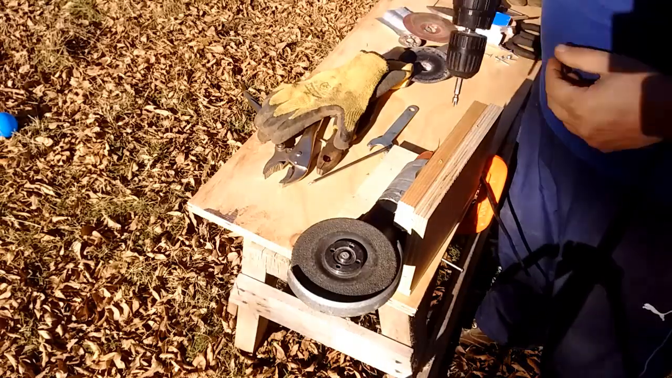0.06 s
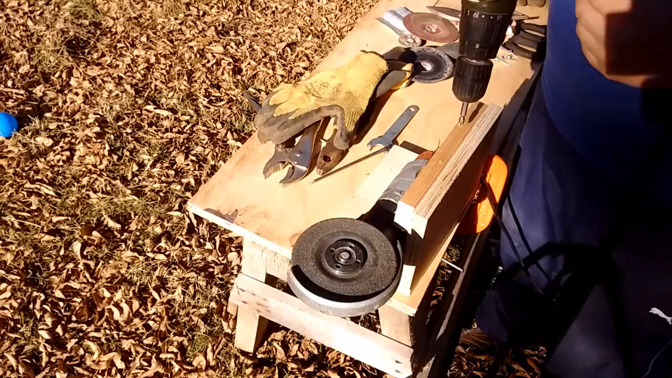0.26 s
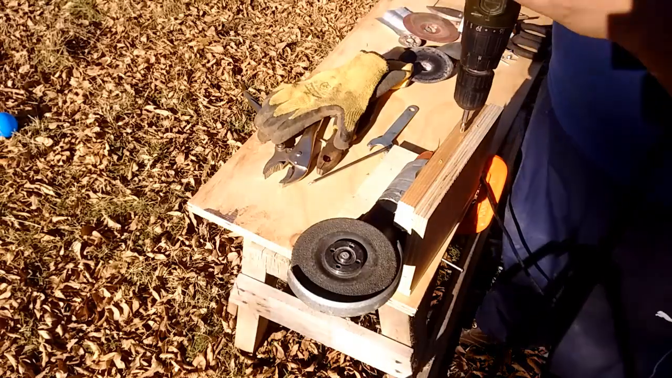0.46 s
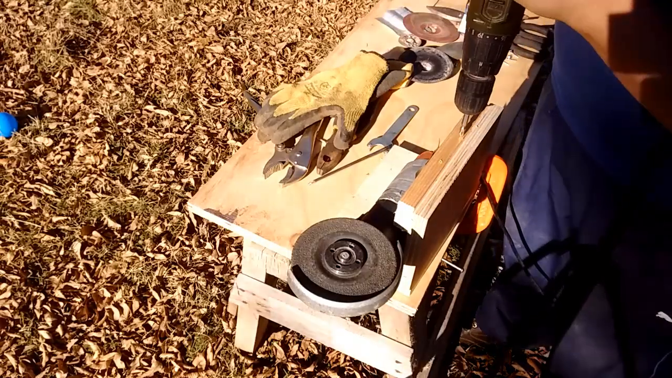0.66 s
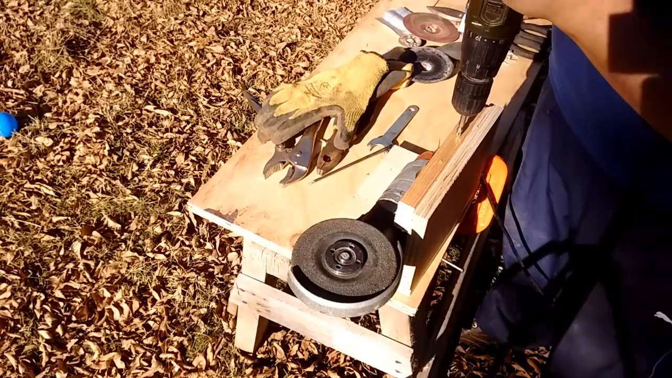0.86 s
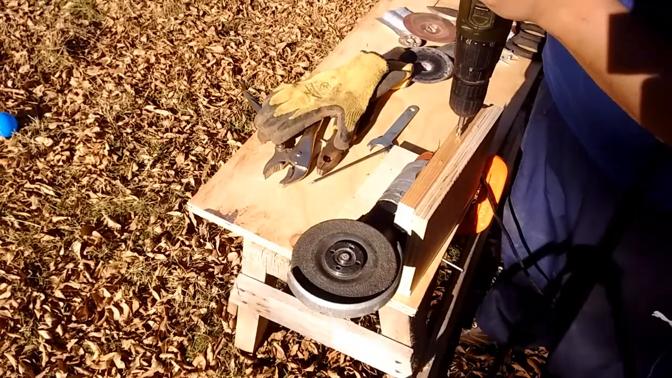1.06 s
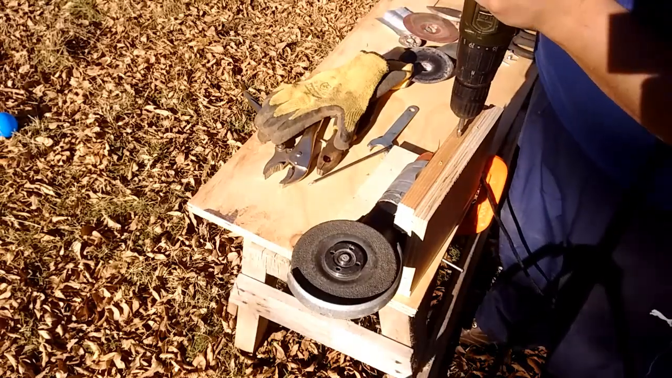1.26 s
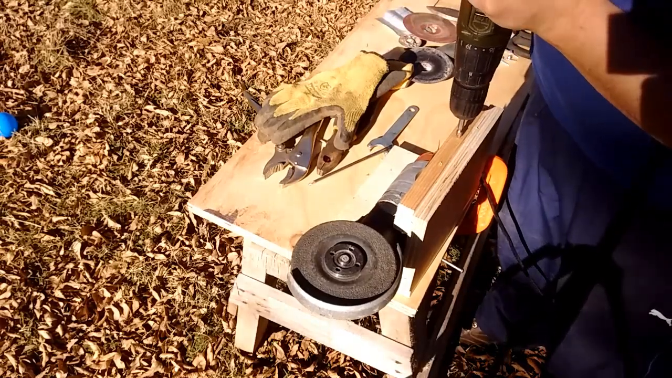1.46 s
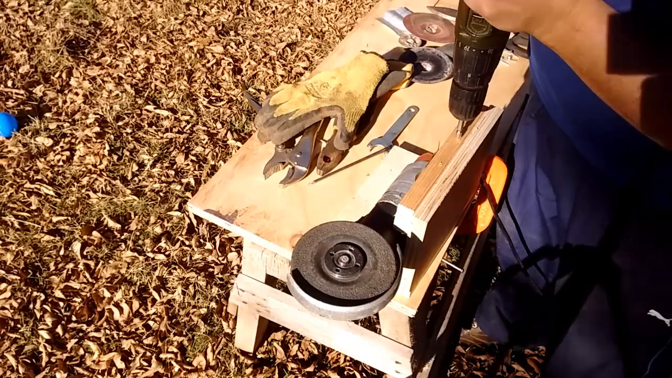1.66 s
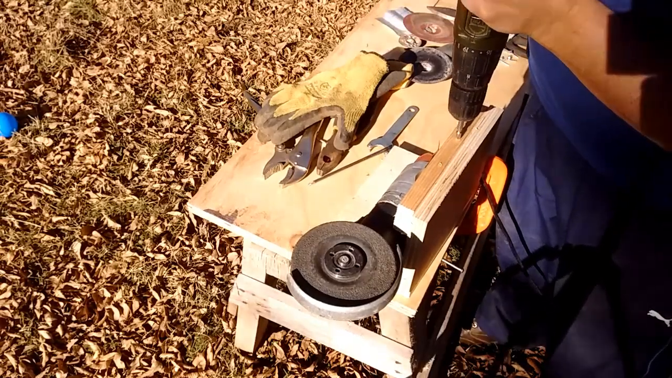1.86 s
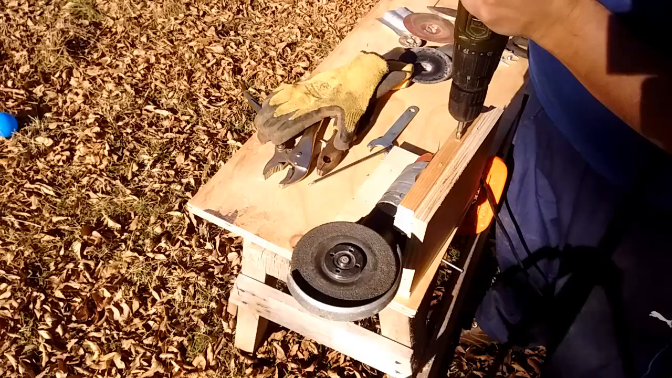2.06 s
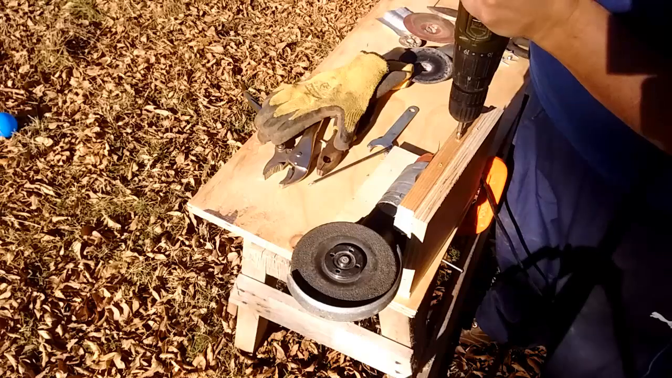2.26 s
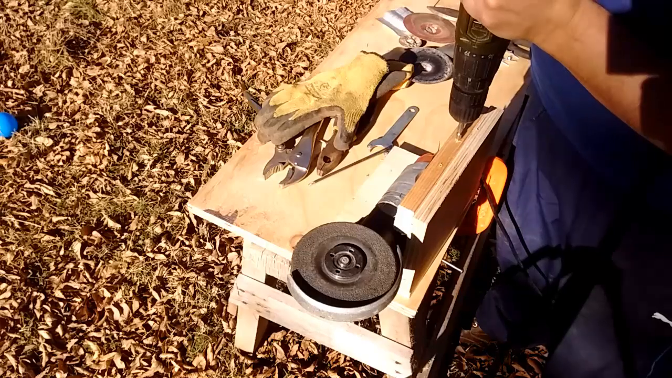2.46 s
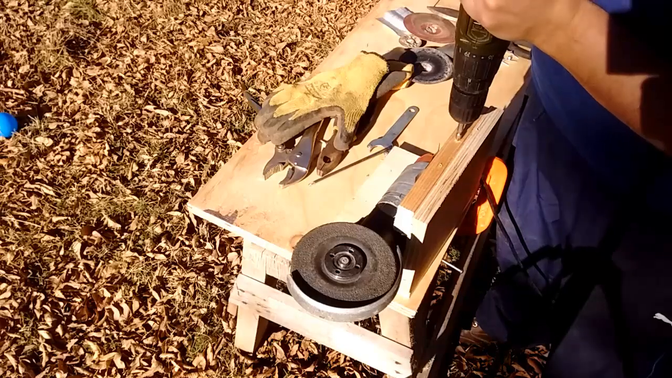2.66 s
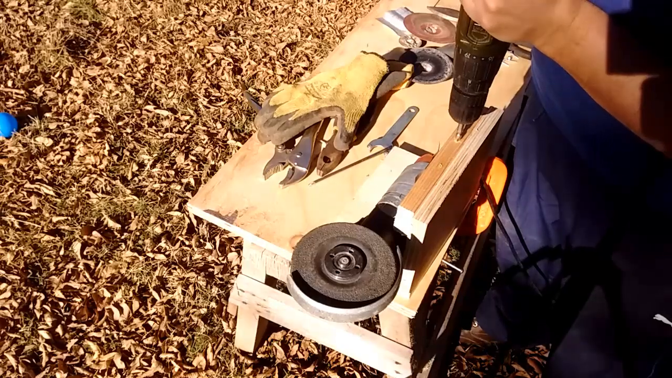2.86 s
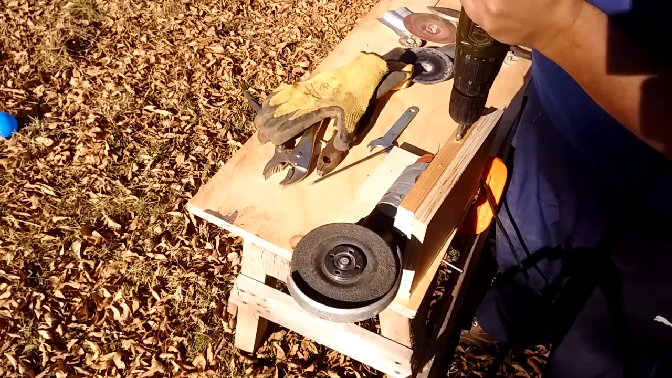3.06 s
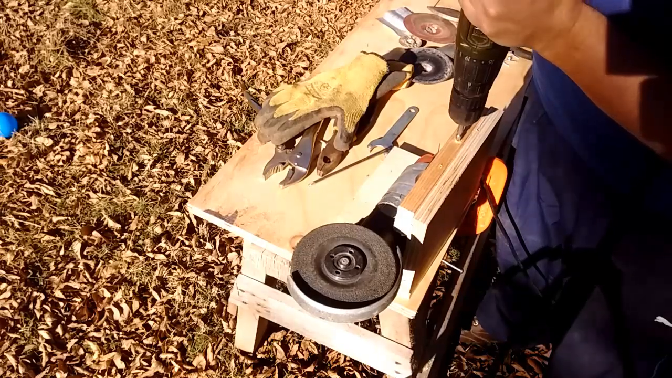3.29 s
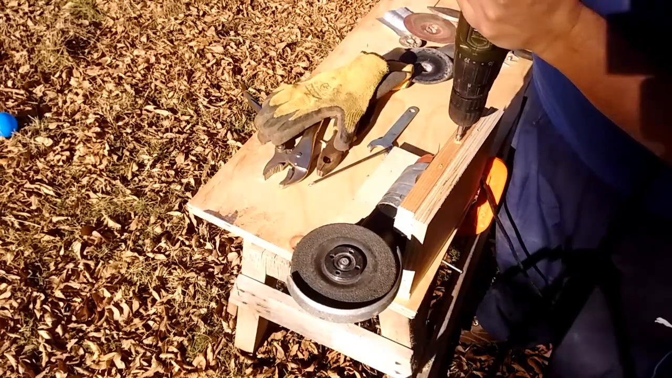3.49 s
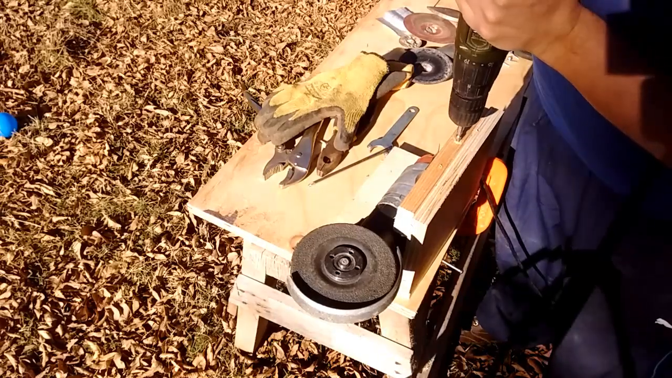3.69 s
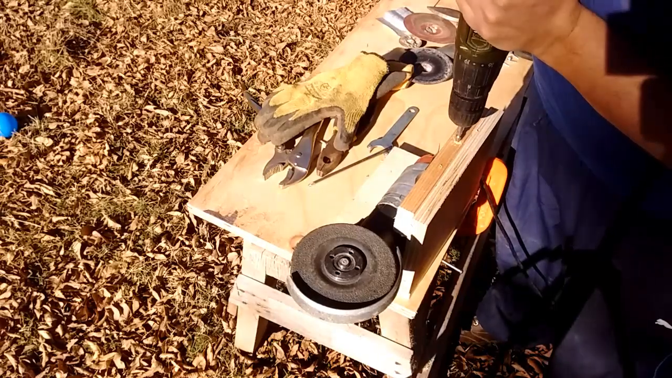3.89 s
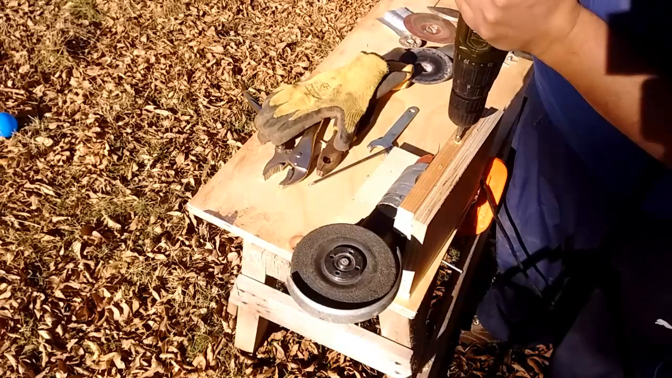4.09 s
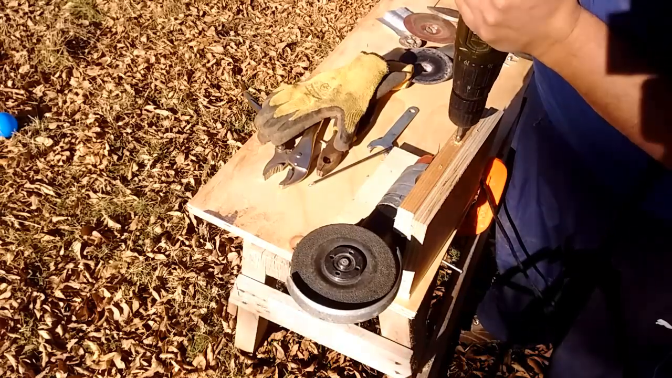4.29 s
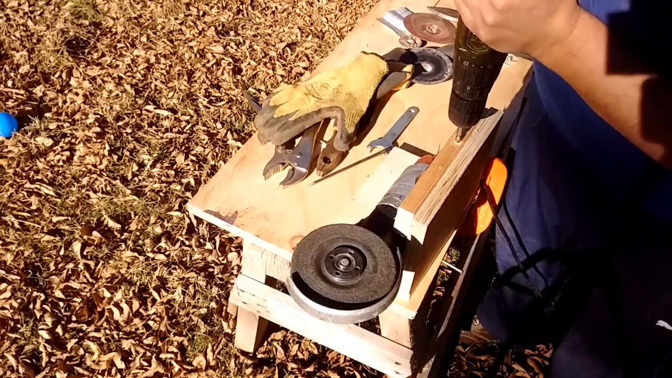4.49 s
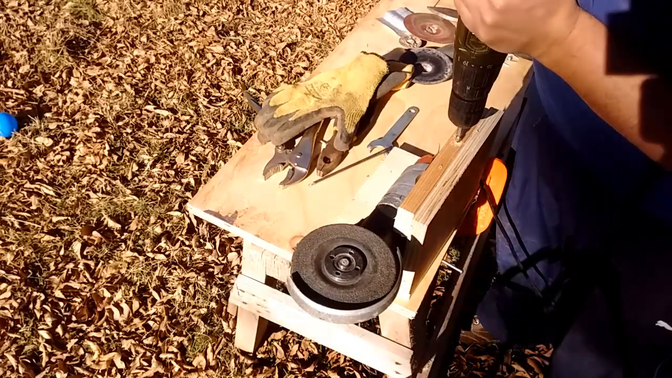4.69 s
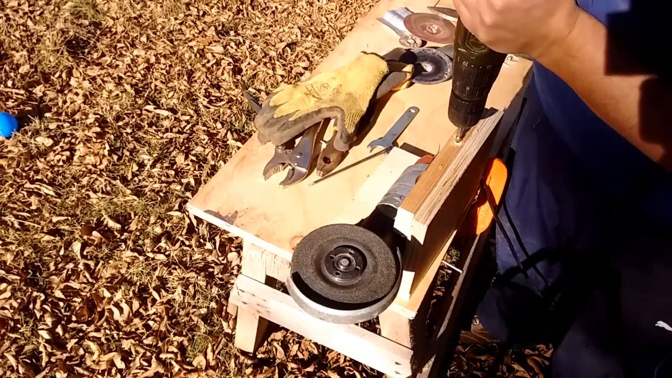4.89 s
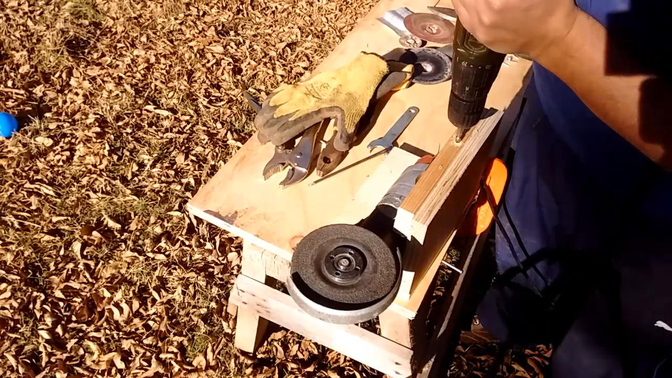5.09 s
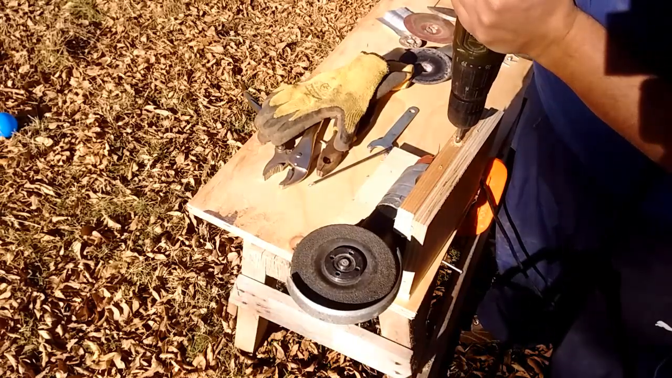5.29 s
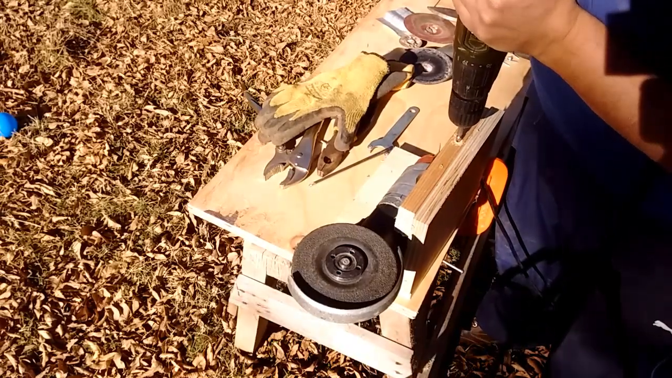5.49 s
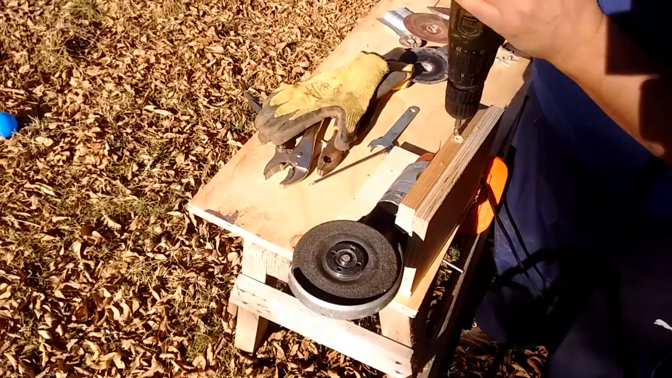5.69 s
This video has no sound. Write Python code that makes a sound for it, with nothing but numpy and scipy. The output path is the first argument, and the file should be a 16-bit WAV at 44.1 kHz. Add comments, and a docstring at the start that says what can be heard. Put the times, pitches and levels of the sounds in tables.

```python
"""Dry leaves rustle and a far road hums outdoors; the drill ticks in the hand and light gusts rumble on the microphone.
At 1.3 s a cordless drill judders and runs up, pressing a countersink into a wooden board. Shaft-locked tones whine
and slowly sag under the load, shaped noise rasps like torn wood, and resonant noise lets the bit squeal as it sinks.
From 3.7 to 4.8 s hard gusts and low thumps strike the microphone, and the drill's level dips briefly.
At 5.5 s the brake judders, the gears clatter to rest as decaying noise, and the chuck and housing tick."""
import sys
import numpy as np
from scipy import signal
from scipy.fft import rfft, irfft, next_fast_len
from scipy.io import wavfile
from scipy.ndimage import uniform_filter1d, map_coordinates

SR = 44100
rng = np.random.default_rng(int(sys.argv[2]) if len(sys.argv) > 2 else 0)


def master_out(mix):
    """Clip the mix to full scale and print it as 16-bit PCM to the path in sys.argv[1]."""
    frames = np.transpose(np.atleast_2d(mix))
    ceiling = np.clip(frames, -1, 1)
    pcm = np.round(ceiling * 32767).astype(np.int16)
    wavfile.write(sys.argv[1], SR, pcm)


N = 253134

# how the two microphone ports hear the bench [f/Hz, left-right/dB, left lead/rad, coherence]
NEAR = [(300, 5.5, -3.1, 0.92), (450, 1.2, -3.1, 0.93), (620, 1.7, -3.0, 0.93), (750, 1.7, -3.0, 0.76),
        (900, 1.7, -3.0, 0.88), (1150, 12.0, -2.4, 0.44), (1350, 13.5, -1.2, 0.44), (1600, 5.9, 0.3, 0.48),
        (1850, 3.1, 1.2, 0.89), (2100, 0.7, 1.6, 0.64), (2400, -1.1, 2.1, 0.78), (2750, 2.1, 2.6, 0.68),
        (3100, 1.5, 3.05, 0.88), (3350, 2.0, 3.0, 0.78), (3650, 4.2, 2.8, 0.8), (4100, 6.8, 2.2, 0.19),
        (4550, 3.0, 0.2, 0.84), (5000, 0.2, 0.3, 0.71), (5600, -2.7, 1.0, 0.29), (6400, 0.1, 2.8, 0.76),
        (7300, 0.5, 0.9, 0.57), (8300, -2.1, 0.2, 0.46), (9500, -0.5, -2.9, 0.16), (11000, 1.8, -5.4, 0.22),
        (13200, 9.6, -5.4, 0.29), (15000, 8.7, -7.0, 0.19)]
# how they hear the yard [f/Hz, left-right/dB, left lead/rad, coherence]
FAR = [(100, 2.4, 3.0, 0.88), (500, 2.1, 3.1, 0.86), (750, 7.4, 3.0, 0.53), (980, 13.7, 0.2, 0.26),
       (1400, 4.0, 0.0, 0.85), (2100, 3.7, -0.2, 0.63), (3000, 3.5, -3.1, 0.75), (3600, 6.1, -2.8, 0.59),
       (4600, 1.5, -0.1, 0.75), (6300, 1.9, -3.2, 0.62), (8000, -0.7, -0.2, 0.53), (13000, 2.0, 0.6, 0.07)]
# shaft speed, sagging as the cone deepens [t/s, speed/turns per s]
SPEED = [(1.56, 308.3), (1.95, 306.6), (2.5, 306.6), (3, 304), (3.65, 302.2), (4.5, 299), (4.8, 299.4),
         (5.45, 296.8)]
# trigger pulled, trigger let go, and the time the gears need to take up their slack (s)
START_S, STOP_S, SLACK_S = 1.272, 5.472, .015


def amp(db):
    """Gain of a level in dB."""
    return 10 ** (np.asarray(db) / 20)


def unit(x):
    """x scaled to an rms of 1."""
    return x / np.sqrt(np.mean(x ** 2) + 1e-20)


def clock():
    """The time of every sample in seconds."""
    return np.arange(N) / SR


def ramp(start_s, length_s):
    """0 before the start, rising evenly to 1."""
    return np.clip((clock() - start_s) / length_s, 0, 1)


def along(rows, hz):
    """Each column of a table after its frequency, read on a log axis."""
    f, *columns = np.transpose(rows)
    return [np.interp(np.log(hz + 1), np.log(f + 1), column) for column in columns]


def curves(rows):
    """One value per sample for each column of a table after its time."""
    s, *columns = np.transpose(rows)
    return [np.interp(clock(), s, column) for column in columns]


def wobble(rate):
    """A smooth random curve, rate knots a second."""
    knots = rng.standard_normal(int(N * rate / SR) + 4)
    return map_coordinates(knots, [np.arange(N) * rate / SR])


def swells(rows, rise_s, fall_s):
    """Gain of events (t/s, hold/s, level/dB) that rise, hold and die away."""
    t = clock()
    events = []
    for s, hold, db in rows:
        rising = np.maximum(s - t, 0) / rise_s
        falling = np.maximum(t - s - hold, 0) / fall_s
        events.append(amp(db) * np.exp(-rising - falling))
    return np.max(events, axis=0)


def filtered(x, response):
    """x shaped by a complex response of frequency."""
    size = next_fast_len(N + SR // 4)
    return irfft(rfft(x, size) * response(np.fft.rfftfreq(size, 1 / SR)), size)[..., :N]


def resonance(hz, centre_hz, width_hz):
    """Response of one damped mode."""
    damping = 1j * hz * width_hz
    return damping / (centre_hz ** 2 - hz ** 2 + damping)


def port_gains(ports, hz):
    """Complex gains of the left and right port, and their coherence."""
    tilt_db, lead, alike = along(ports, hz)
    pair = np.array([amp(tilt_db / 2) + 0j, amp(-tilt_db / 2) * np.exp(-1j * lead)])
    return pair / np.sqrt(np.mean(abs(pair) ** 2, axis=0)), np.clip(alike, 0, 1)


def rush(colour, ports):
    """Coloured noise of rms 1 as the two ports hear it."""
    size = next_fast_len(N)
    hz = np.fft.rfftfreq(size, 1 / SR)
    a, b = rfft(rng.standard_normal((2, size)))
    pair, alike = port_gains(ports, hz)
    left_right = np.array([a, alike * a + np.sqrt(1 - alike ** 2) * b])
    return unit(irfft(left_right * pair * colour(hz), size)[:, :N])


def leaves():
    """Dry leaves rustle as fluttering noise that slowly dies down."""
    # colour of the rustle [f/Hz, relative level/dB per Hz]
    leaf_colour = [(60, -11), (300, -2.5), (550, 4.5), (800, 0.5), (1100, 3), (1350, 3.5), (1700, -2),
                   (2300, 3), (3100, -4.5), (4000, -6.5), (6000, -17.5), (8500, -18), (15000, -22.5)]
    level_db, calm_db_per_s = -50, 1.1
    rustle = amp(.7 * wobble(rate=30) + .7 * wobble(rate=500))
    noise = rush(lambda hz: amp(along(leaf_colour, hz)[0]), FAR)
    return amp(level_db - calm_db_per_s * clock()) * rustle * noise


def far_road():
    """Tyre noise of a far road hums in three bands and swells now and then."""
    # swells above the steady hum [t/s, hold/s, level/dB]
    road_swells = [(.57, 0.11, -49.5), (.95, .1, -52.5), (1.12, 0.045, -46.5)]
    # bands of the tyre noise [f/Hz, width/Hz, relative level/dB]
    tyre_bands = [(706, 100, -6.5), (952, 110, 1), (1386, 110, -8)]
    hum_db = -61
    traffic = np.hypot(amp(hum_db), swells(road_swells, rise_s=0.11, fall_s=0.17))

    def colour(hz):
        return sum(amp(db) * abs(resonance(hz, centre, width)) ** 2 for centre, width, db in tyre_bands)

    return traffic * rush(colour, FAR)


def wind():
    """Gusts rumble on the microphone ports; the harder they blow, the higher they reach."""
    # colour of the rumble [f/Hz, light relative level/dB per Hz, hard relative level/dB per Hz]
    buffet_colour = [(15, -32, -38), (39.7, 4.5, -39), (73.5, 0.5, -0.5), (110, -11, -3.5), (167, -41, -12),
                     (232, -50, -20.5), (374, -45, -26), (1000, -74, -85), (3000, -120, -120)]
    # gusts [t/s, hold/s, level/dB]
    gusts = [(.68, 0.026, -42.5), (1.41, 0.09, -45), (3.718, 0.025, -29), (3.81, 0.021, -42),
             (4.1, 0.14, -35), (4.4, 0.075, -42), (4.62, 0.033, -31), (4.69, 0.13, -31.5)]
    # breeze between them, before its eddies [t/s, level/dB]
    breeze_levels = [(0, -59), (.3, -48), (3.6, -54), (4.85, -44), (5.05, -57), (5.7, -56)]
    breeze = amp(curves(breeze_levels)[0])
    gust = swells(gusts, rise_s=0.0068, fall_s=0.026)
    gust_db = 20 * np.log10(np.maximum(breeze, gust))
    light = rush(lambda hz: amp(along(buffet_colour, hz)[0]), FAR)
    hard = rush(lambda hz: amp(along(buffet_colour, hz)[1]), FAR)
    force = np.clip((gust_db + 46.0) / 16, 0, 1)
    buffet = np.sqrt(1 - force) * light + np.sqrt(force) * hard
    # level out the noise so that it follows the gust curve
    loudness = np.sqrt(abs(uniform_filter1d(np.mean(buffet ** 2, axis=0), size=SR // 70)) + 1e-6)
    # a light breeze arrives in separate eddies
    eddies_db = (1 - force) * (3.2 * wobble(rate=26) - .5)
    return amp(gust_db + eddies_db) * buffet / loudness


def thumps():
    """Each eddy that strikes the microphone is one low push and pull on the ports."""
    # single eddies [t/s, level/dB, f/Hz]
    eddies = [(.382, -31, 115), (.803, -20.5, 110), (1.403, -26.5, 85), (1.456, -32, 99), (2.5, -34, 80),
              (3.719, -19, 116), (3.742, -26, 113), (3.812, -18, 110), (3.875, -34, 104), (3.941, -25, 115),
              (4.015, -34, 90), (4.089, -17, 140), (4.162, -28, 91), (4.194, -28, 118), (4.22, -20, 125),
              (4.278, -32, 90), (4.404, -32, 100), (4.61, -27, 92), (4.639, -23, 105), (4.703, -22, 103),
              (4.743, -20, 113), (4.777, -16.5, 135), (4.8, -25, 146), (4.825, -30, 110)]
    length_cycles = .62
    out = np.zeros((2, N))
    for s, db, hz in eddies:
        cycles = hz * (clock() - s)
        push = amp(db) * np.exp(-(cycles / length_cycles) ** 2 + 2j * np.pi * cycles)
        out += np.imag(port_gains(FAR, hz)[0][:, None] * push)
    return out


def ticks():
    """Contacts and slides of chuck and housing, each a burst of noise with one broad ring."""
    # ticks as the drill is handled [t/s, level/dB, ring f/Hz, t60/s]
    contacts = [(0.011, -37.5, 2330, 0.024), (.0485, -32, 2350, 0.022), (.075, -56.5, 5000, 0.63),
                (0.269, -48, 4000, .02), (1.3327, -24, 2600, 0.0087), (5.473, -26, 2800, .006),
                (5.535, -29, 7800, 0.0059), (5.545, -48, 6000, .02), (5.572, -45, 7900, 0.0069),
                (5.576, -38.5, 7700, 0.014), (5.574, -45, 555, 0.076), (5.6, -60, 7900, 1),
                (5.615, -37.5, 7500, 0.0068), (5.631, -49, 7900, .01), (5.674, -45, 6760, 0.015),
                (5.715, -43, 5160, 0.035), (5.715, -38, 674, 0.05), (5.724, -44, 7900, .012)]
    rise_s = .0004
    out = np.zeros((2, N))
    for s, db, ring_hz, t60 in contacts:
        crack = rush(lambda hz: abs(resonance(hz, ring_hz, .3 * ring_hz)) ** 1.5, NEAR)
        out += crack * ramp(s - rise_s, rise_s) * amp(db - 60 * abs(clock() - s) / t60)
    return out


def judders():
    """Short narrow tones of unsteady pitch: a brief electronic whine as the trigger is pulled, then sudden
    changes of torque that shake single modes of drill and board."""
    # a whine as the trigger is pulled, then judders as the bit bites and the brake grips [t/s, length/s, f/Hz,
    # width/Hz, level/dB]
    jerks = [(1.267, 0.037, 5160, 450, -45.5), (1.301, 0.033, 2340, 255, -28.5),
             (1.309, 0.02, 641, 452, -32.5), (1.338, 0.026, 683, 159.5, -24), (1.354, 0.09, 2338, 218, -33),
             (5.47, .014, 2400, 296.5, -31), (5.463, .012, 1400, 300, -38), (5.478, 0.016, 720, 300, -21.5)]
    out = np.zeros((2, N))
    for s, length, centre_hz, width_hz, db in jerks:
        pitch_hz = centre_hz + width_hz / 3 * wobble(width_hz)
        angle = 2 * np.pi * np.cumsum(pitch_hz) / SR
        swell = amp(db + 1.5 * wobble(rate=250)) * np.exp(-2 * ((clock() - s) / length) ** 2)
        gains = port_gains(NEAR, centre_hz)[0][:, None]
        out += np.sqrt(2) * swell * np.real(gains * np.exp(1j * angle))
    return out


def lines(rows, turns, flutter_db, play, speed=None):
    """Shaft-locked tones: backlash shakes their phase, uneven load their size; a given speed moves their port gains."""
    out = np.zeros((2, N))
    backlash = play * wobble(rate=70)
    speed = np.mean(SPEED, axis=0)[1:] if speed is None else speed
    for multiple, db in rows:
        size = amp(db) * unit(amp(flutter_db * wobble(rate=35)))
        angle = 2 * np.pi * multiple * (turns + backlash)
        gains = port_gains(NEAR, multiple * speed)[0]
        out += np.sqrt(2) * size * np.real(gains * np.exp(1j * angle))
    return out


def body_db(hz):
    """Lift that the resonances of housing, bit and board give to each frequency."""
    # resonances [f/Hz, width/Hz, lift/dB]
    body_modes = [(321, 44, 16.5), (450, 23, 11), (646, 101, 12.5), (913, 54, 12), (1332, 320, 10),
                  (1833, 145, 6), (2756, 73, 7), (3580, 330, 8.5), (4540, 620, 4), (5640, 110, 6.5),
                  (6500, 110, 6), (13700, 1500, 5)]
    return sum(db * abs(resonance(hz, centre, width)) ** 2 for centre, width, db in body_modes)


def spin_up(turns, speed, pace):
    """Under starting torque rough motor tones sweep up through the resonances of the body."""
    # motor tones under strain [multiple of the shaft speed, level before body and torque/dB]
    strained_tones = [(3, -37), (4, -39.5), (6.066, -43), (8.333, -36), (15, -46)]
    torque = 4 * pace * (1 - pace) * ramp(START_S + SLACK_S, SLACK_S) * (clock() < STOP_S)
    rough = unit(amp(2 * wobble(rate=400)))
    jolts = .011 * wobble(rate=350)
    rows = [(multiple, db + body_db(multiple * speed)) for multiple, db in strained_tones]
    return torque * rough * lines(rows, turns + jolts, flutter_db=1.5, play=.002, speed=speed)


def run_down(turns):
    """The braked gears clatter to rest in the midrange, ever more slowly, outlasting the cut."""
    # colour of the clatter [f/Hz, relative level/dB per Hz]
    clatter_colour = [(150, -24), (400, -3), (620, 6.5), (950, 3.5), (1130, -6), (1400, -0.5), (1750, -11),
                      (2400, -3), (3200, -12), (3900, -8), (4250, -9), (4800, -13.5), (12000, -24)]
    level_db, fade_db_per_s, rise_s = -37.5, 95, 0.0038
    turn_knock = np.cos(2 * np.pi * (turns - turns[-1] + .25))
    knocks = unit(amp(4 * turn_knock + 2 * wobble(rate=160)))
    clatter = rush(lambda hz: amp(along(clatter_colour, hz)[0]), NEAR) * knocks
    return clatter * ramp(STOP_S, rise_s) * amp(level_db - fade_db_per_s * abs(clock() - STOP_S))


def squeal(turns, chuck, pulse_db, beat_db):
    """Friction rings each bit mode at its own point of the chuck's turn; a high gear tone beats with the upper one."""
    # ringing of the steel bit, growing as it sinks in [t/s, level relative to the drill's loudness/dB]
    squeal_levels = [(1.3, -44), (2.3, -39), (2.9, -17.5), (3.6, -14.5), (4.1, -12.5), (4.55, -14.5),
                     (5, -14), (5.45, -12)]
    # modes of the bit [f/Hz, width/Hz, relative level/dB, lag behind the surge/chuck turns]
    bit_modes = [(4555, 420, -2, 0.014), (7310, 83, 0.5, .25)]
    # gear tone that beats with the upper mode [multiple of the shaft speed, relative level/dB]
    beating_tone = [(24.26, -8.5)]
    squeal_db, = curves(squeal_levels)

    def swing(lag, depth_db):
        return unit(amp(depth_db * np.cos(2 * np.pi * (chuck - lag))))

    ring = np.zeros((2, N))
    for centre, width, db, lag in bit_modes:
        mode = rush(lambda hz: resonance(hz, centre, width) ** 2, NEAR)
        ring += amp(db) * np.sqrt(width) * swing(lag, pulse_db) * mode
    upper_lag = bit_modes[-1][-1]
    beats = swing(upper_lag, beat_db) * lines(beating_tone, turns, flutter_db=3, play=0.0034)
    return amp(squeal_db) * (unit(ring * amp(wobble(rate=8.6))) + beats)


def colour_of_cut(hz):
    """Gain of the cutting noise through housing, bit and board."""
    # cutting and fan noise before the body [f/Hz, relative level/dB per Hz]
    rasp_colour = [(100, -68), (200, -33), (420, -5.5), (800, -6.5), (1050, -8), (1600, -11), (2300, 2),
                   (2850, -1), (3200, -4.5), (3550, -7), (4200, -6), (5200, -8.5), (6500, -10.5),
                   (8500, -11.5), (11000, -16), (15000, -22)]
    return amp(along(rasp_colour, hz)[0] + body_db(hz))


def gear_whir(turns):
    """The roughness of the teeth comes round with each turn of the planet carrier: a comb of fine lines."""
    bumps = 800  # in one turn of the carrier, which takes six of the motor
    place = bumps * (turns + .002 * wobble(rate=40)) / 6
    teeth = map_coordinates(rng.standard_normal(bumps), [place % bumps], mode="grid-wrap")
    return unit(filtered(teeth, lambda hz: port_gains(NEAR, hz)[0] * colour_of_cut(hz) * (hz > 1000)))


def patchy(x, depth_db):
    """Random hollows, a few hundred hertz wide and some tens of milliseconds long."""
    z = signal.stft(x, nperseg=1024)[2]
    field = rng.standard_normal(z.shape[1:])
    field = uniform_filter1d(uniform_filter1d(field, size=4, axis=0), size=6, axis=1)
    gain = unit(amp(depth_db * np.minimum(unit(field), .5)))
    return signal.istft(z * gain, nperseg=1024)[1][:, :N]


def rasp(turns, treble_db, scrape_db, grumble_db, carrier_db, shaft_db, grain_db, brush_db, bump_db):
    """Fibres tear in small grains, in surges set by the cutting edges, the planet carrier, the shaft and its brushes."""
    repeat_share = .14  # share of the power that repeats with the gears
    noise = np.sqrt(1 - repeat_share) * rush(colour_of_cut, NEAR) + np.sqrt(repeat_share) * gear_whir(turns)
    wood = filtered(noise, lambda hz: 1 / (1 + (hz / 3800) ** 6))
    board = filtered(noise, lambda hz: 1 / (1 + (hz / 950) ** 6))
    # motor turns per surge: 15, 6 and 1
    edges, carrier, shaft = (np.cos(2 * np.pi * turns / ratio) for ratio in (15, 6, 1))
    # the board grumbles unevenly as the edges catch in its grain
    low = patchy(board, bump_db) * unit(amp(grumble_db * (edges + wobble(rate=16))))
    middle = (wood - board) * amp(scrape_db * edges + .6 * wobble(rate=45))
    high_db = treble_db + carrier_db * carrier + shaft_db * shaft + .5 * wobble(rate=45)
    high = (noise - wood) * amp(high_db)
    # three brush pulses a turn
    brushes = np.cos(6 * np.pi * (turns + .07 * wobble(rate=50)))
    return unit((low + middle + high) * amp(grain_db * wobble(rate=900) + brush_db * brushes))


def drill():
    """Hum, whine, rasp and squeal all follow the one motor shaft; the load grows with the square of the cone's depth."""
    # motor lines [multiple of the shaft speed, relative level/dB]
    motor_lines = [(2, -13), (3, -18.5), (4, -20), (6, -19), (8, -23), (9, -17.5), (12, -22), (15, -15),
                   (18, -28), (21, -27), (25, -32), (27, -31), (28, -33), (29, -29), (32, -34), (33, -35),
                   (34, -32), (38, -35), (40, -35), (43, -31), (44, -31.5), (46, -37.5)]
    # meshes of the planetary gearbox and their sidebands
    # [multiple of the shaft speed, relative level/dB, change at full load/dB]
    gear_meshes = [(2.183, -21, 2), (6.066, -11, -4), (8.333, -21, 2), (9.1, -16.5, 11), (9.333, -14.5, -3),
                   (10.333, -22.5, 3), (12.13, -22.5, 12), (15.165, -19, 2), (21.25, -25, 3),
                   (33.36, -42, 10), (47.3, -44, 12)]
    # pressure of the hand [t/s, loudness of the cut/dB, its surge once a chuck turn/dB]
    hand_pressure = [(1.31, -27, 0), (1.45, -30, 0.5), (1.56, -28, -0.5), (1.85, -27.5, 0), (2.3, -27, 0.6),
                     (2.8, -27.5, 0.2), (3.15, -29, 1), (3.55, -28, 1.6), (3.9, -28, -0.3), (4.2, -29, 0.6),
                     (4.55, -27.5, -0.4), (5.2, -28, -0.2), (5.45, -28.5, 0.1)]
    spin_s, brake_s = .042, 0.045  # time constants of spin-up and brake
    motor_turns_per_chuck_turn, crest_s = 58.6, 1.8  # one crest of the surge falls at crest_s
    running, braking = np.maximum(clock() - START_S, 0), np.maximum(clock() - STOP_S, 0)
    depth = ramp(START_S, STOP_S - START_S)
    load = depth ** 2
    unseated = 1 - ramp(START_S, 0.55)  # the bit seats within this many seconds

    pace = (1 - np.exp(-running / spin_s)) * np.exp(-braking / brake_s)
    speed = pace * curves(SPEED)[0] * (1 + .0005 * wobble(rate=18))
    turns = np.cumsum(speed) / SR
    chuck = (turns - np.interp(crest_s, clock(), turns)) / motor_turns_per_chuck_turn

    # hum and whine build up as the bit seats and fade under load; the motor lines are there from the start
    hum_db = 1.6 - 10 * unseated - 3 * load
    whine_db = 1 - 19 * unseated - 7.5 * load
    motor_db = 0.37 - load
    hum = amp(hum_db) * lines([(0.99, -13.5)], turns, flutter_db=3.0, play=0.069)
    motor = lines(motor_lines, turns, flutter_db=3.6, play=.0015)
    # one more motor line sings out before the bit has seated, then fades
    singing_db = -13.5 - 7 * running
    motor += lines([(16, singing_db)], turns, flutter_db=2, play=.001)
    loaded_meshes = [(multiple, db + change * load) for multiple, db, change in gear_meshes]
    gears = lines(loaded_meshes, turns, flutter_db=1.8, play=.002)
    tones = pace ** 4 * (hum + amp(whine_db) * gears + amp(motor_db) * motor)

    treble_db = -0.5 - 5.5 * (1 - pace)  # duller at low speed
    cutting = rasp(turns, treble_db, scrape_db=0.3, grumble_db=1.6, carrier_db=0.5, shaft_db=0.4,
                   grain_db=0.6, brush_db=.9, bump_db=10)
    ringing = squeal(turns, chuck, pulse_db=2.5, beat_db=5)

    # the tones ride over the quick surges of the cut
    pressure_db, surge_db = curves(hand_pressure)
    once_db = surge_db * np.cos(2 * np.pi * chuck)
    twice_db = 0.5 * np.cos(4 * np.pi * chuck)
    surge = amp(once_db + twice_db + 0.55 * wobble(rate=16))
    attack = ramp(START_S - SLACK_S, 0.04) ** 0.93
    release = amp(-361 * braking)  # dB per second: the cut dies fast under the brake
    envelope = amp(pressure_db) * attack * release
    sound = envelope * (tones + surge * (amp(-1.5) * cutting + pace * ringing))
    return sound + spin_up(turns, speed, pace) + run_down(turns)


def dipped(x):
    """The level drops quickly and creeps back; the bass drops further and returns later."""
    # dips; a negative depth leaves the overall level alone [t/s, depth/dB, extra depth of the bass/dB]
    dips = [(1.24, -1.5, 6.5), (3.687, 5.5, 14.5), (4.2, -0.5, 12), (4.738, 10.5, 23)]
    fall_s, recover_s, bass_recover_s, bass_edge_hz = 0.042, 0.53, 0.68, 560

    def dip(s, return_s):
        return ramp(s, fall_s) - ramp(s + fall_s, return_s)

    all_db = np.max([db * dip(s, recover_s) for s, db, _ in dips], axis=0)
    bass_db = np.max([db * dip(s, bass_recover_s) for s, _, db in dips], axis=0)
    bass = filtered(x, lambda hz: 1 / (1 + (hz / bass_edge_hz) ** 10))
    return amp(-all_db) * (x - bass + amp(-bass_db) * bass)


def scene():
    """Yard and wind behind the handled drill; only the drill's running sound dips."""
    background = leaves() + far_road() + wind() + thumps()
    return background + ticks() + judders() + dipped(drill())


def record(dry):
    """A steep low-pass removes the sound above the band limit."""
    top_hz = 15450
    return filtered(dry, lambda hz: 1 / (1 + (hz / top_hz) ** 120))


dry = scene()
out = record(dry)
master_out(out)
```